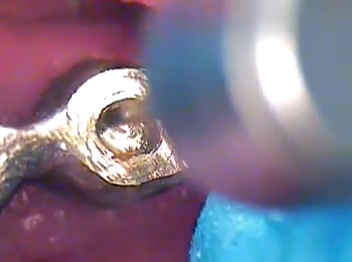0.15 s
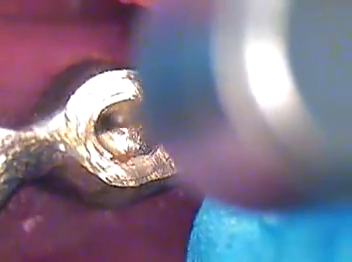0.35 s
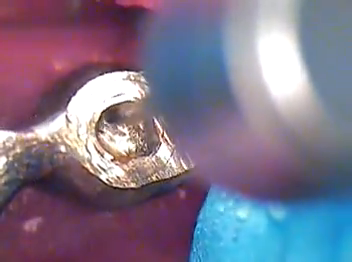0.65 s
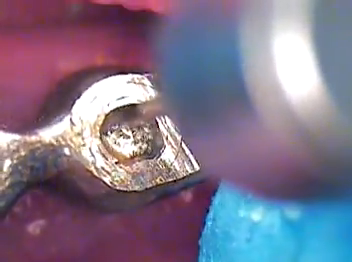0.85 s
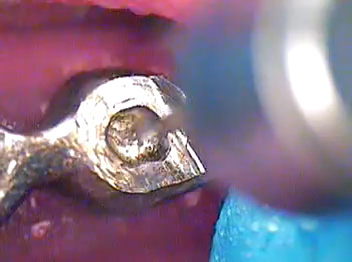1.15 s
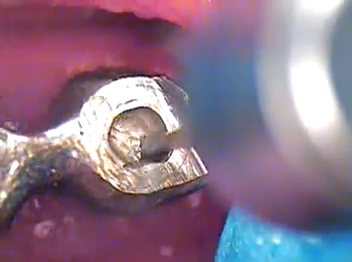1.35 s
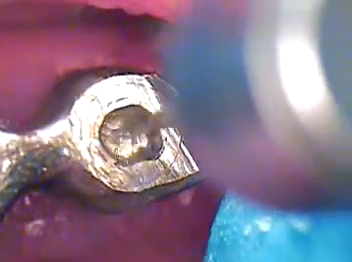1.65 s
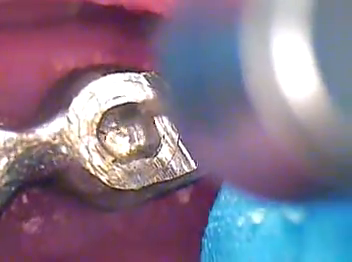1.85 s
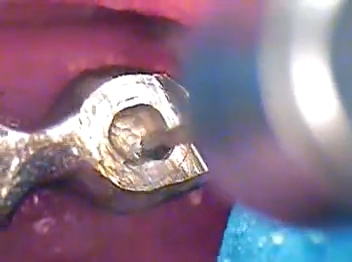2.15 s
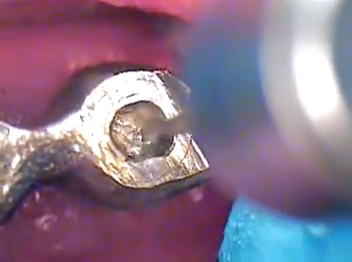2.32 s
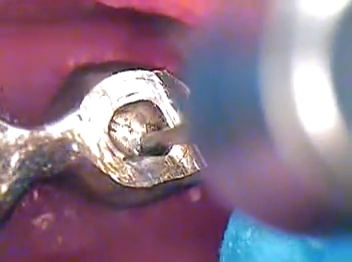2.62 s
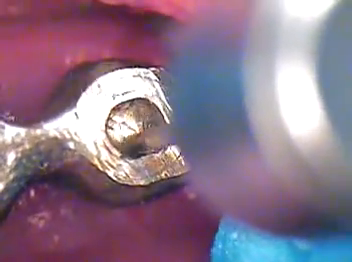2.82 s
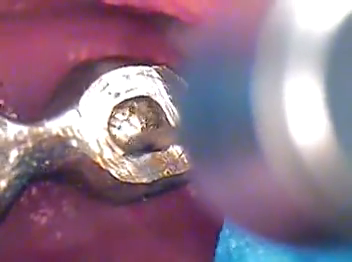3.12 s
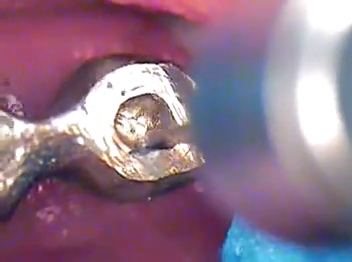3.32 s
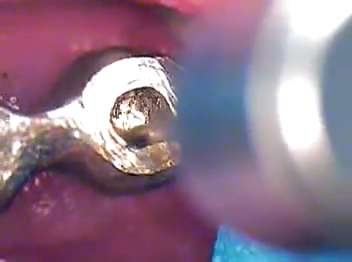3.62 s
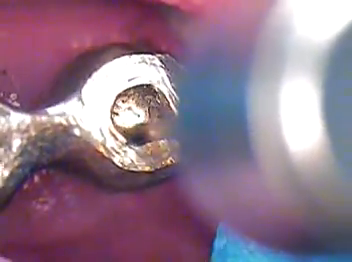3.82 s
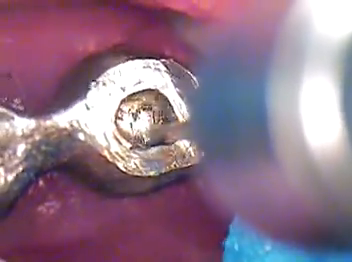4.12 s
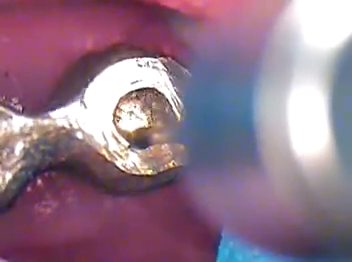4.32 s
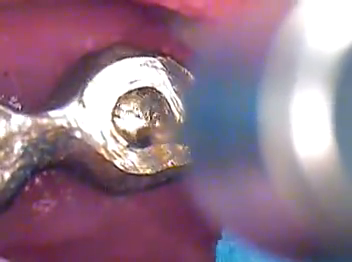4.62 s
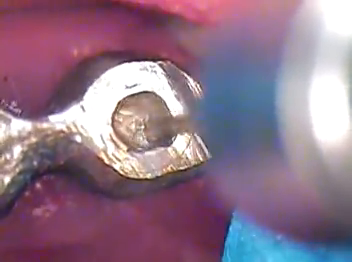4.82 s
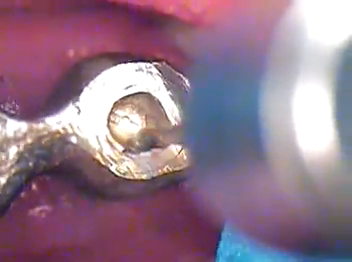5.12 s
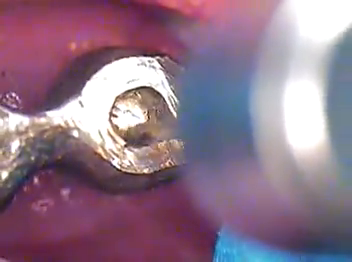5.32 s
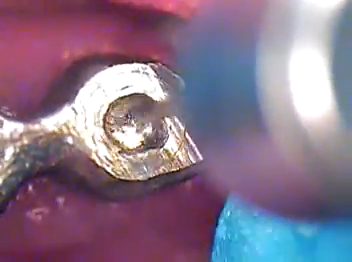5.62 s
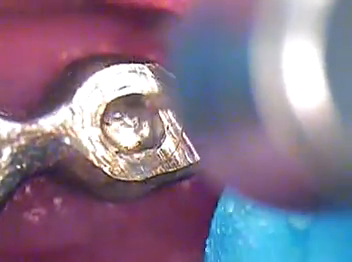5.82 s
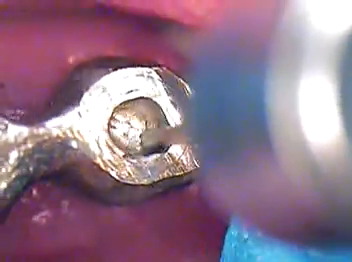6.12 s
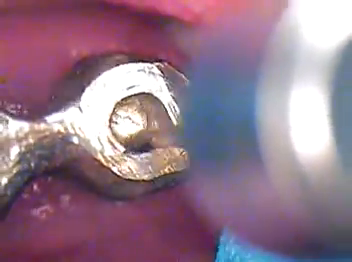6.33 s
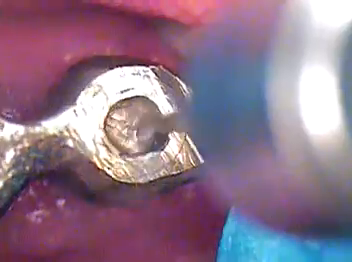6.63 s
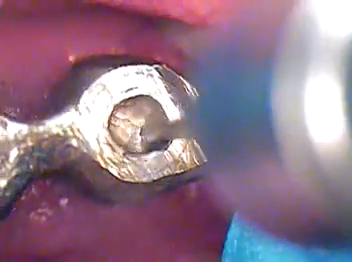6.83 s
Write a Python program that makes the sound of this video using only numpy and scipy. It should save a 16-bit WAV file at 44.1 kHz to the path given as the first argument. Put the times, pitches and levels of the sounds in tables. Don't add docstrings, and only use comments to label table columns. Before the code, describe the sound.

Close up in a small hard room, an air-driven dental drill cuts metal. Bright, dense spray hiss dominates throughout, pulsing gently with hand strokes. Inside it sits a thin, very high whine, first faint with a higher octave, then clearer from the middle, sagging and recovering before rising in pitch. Softer exhaust and suction rush lie beneath, with barely audible low knocks.

```python
import sys
import numpy as np
from scipy import signal
from scipy.fft import rfft, irfft
from scipy.io import wavfile
from scipy.ndimage import uniform_filter1d

SR = 44100
rng = np.random.default_rng(int(sys.argv[2]) if len(sys.argv) > 2 else 0)


def volts_from_decibels(level):
    exponent = np.asarray(level, float) / 20
    return 10 ** exponent


def int16_out(signal):
    q = np.round(np.clip(np.atleast_2d(signal).T, -1, 1) * 32767)
    wavfile.write(sys.argv[1], SR, q.astype(np.int16))


N = 306936
T = np.arange(N) / SR
HZ = np.arange(N // 2 + 1) * SR / N

# time_s, shaft_rate_hz
SHAFT_SPEED = [(0, 4608), (.6, 4241), (1.15, 4630), (1.76, 4479), (2.42, 4705), (2.63, 4900), (2.82, 4720),
               (3.86, 4736), (4.31, 5142), (4.7, 4807), (4.88, 5352), (5.19, 5632), (5.82, 5342),
               (6.02, 5525), (6.26, 5508), (6.96, 5365)]
# middle_s, length_s, sag_hz
BUR_BITES = [(.206, .33, 39), (.704, .07, 54), (2.917, .09, 89), (3.121, .2, 190), (3.237, .547, 377),
             (3.861, .848, 420), (3.919, .183, 128), (4.463, .128, 83), (5.343, .507, 106),
             (5.665, .183, 83), (6.44, .36, 85), (6.715, .359, 158)]
# time_s, shaft_tone_db, octave_db
GRIP_LEVELS = [(0, -58, -48), (.39, -57, -33), (2.38, -56, -44), (2.52, -43, -45), (2.65, -47, -35),
               (4.73, -45, -35.5), (4.8, -38, -61), (5.6, -42, -61), (6.96, -41, -57)]
# middle_s, length_s, shaft_change_db, octave_change_db
HEAD_TURNS = [(.43, .2, -4, -15), (.63, .2, 3, 3), (1.3, 1.3, 0, -12), (2.09, .6, 0, -5),
              (2.76, .19, 0, -10), (2.9, .4, -16, -4), (3.15, .22, -8, -11), (3.36, .42, -11, -1),
              (3.74, .26, -14, -12), (3.89, .1, 3, 4), (3.98, .14, -2, -9), (4.05, .12, -8, 0),
              (4.17, .11, 0, -8), (4.33, .3, -2, -2), (4.46, .18, -6, -8), (4.57, .1, -10, 0),
              (4.89, .12, -4, 0), (5.02, .12, -6, 0), (5.11, .14, 2, 0), (5.32, .1, -9, 5),
              (5.7, .25, -6, 9), (5.79, .1, -16, 14), (5.91, .12, 4, 0), (5.98, .07, -4, 0),
              (6.16, .3, 5, 0), (6.31, .11, -7, 6), (6.39, .32, -2, 14), (6.57, .18, 5, 0),
              (6.71, .3, 1, 12), (6.79, .13, -6, 0)]
# multiple_of_shaft_rate, start_s, end_s, level_db
BEARING_LINES = [
    (1.195, 0, .7, -59),
    (1.195, 1.1, 1.7, -60),
    (1.195, 2.3, 4.3, -60),
    (1.195, 5.05, 5.3, -55),
    (.798, .1, 2.3, -58),
    (1.398, .5, 1.1, -60),
    (1.797, .3, 2.1, -52),
    (1.797, 3.3, 4.1, -53),
    (.595, 5.4, 6.4, -56),
    (.333, 5.85, 6.15, -66),
]

BAND_EDGES = (140, 900, 2500, 6300, 8300, 10800, 15000)
# frequency_hz, density_db_per_hz
SPRAY_OUTLINE = [(6300, -71), (7004, -57), (7786, -62), (8656, -60), (9623, -59), (10699, -72),
                 (11894, -62), (13223, -63), (14000, -72), (14420, -72), (14600, -83), (14700, -92),
                 (14740, -135)]
# centre_hz, width_hz, gain_db
SPRAY_RESONANCES = [(6491, 215, -2), (6593, 84, 3), (7040, 123, -3), (7316, 59, 2), (7820, 388, 2),
                    (8184, 114, -3), (8305, 83, -4), (8690, 388, 6), (9194, 118, -3), (9338, 129, 1),
                    (9587, 129, -4), (10007, 273, 2), (10157, 129, -3), (10487, 114, -3), (10725, 194, 3),
                    (10914, 215, -2), (11047, 388, -3), (11412, 179, 2), (12775, 689, -2), (13632, 388, -4),
                    (13869, 235, 1)]
# time_s, splash_db
SPLASH_LEVELS = [(0, -24.5), (.32, -25), (1.08, -23), (1.47, -26.5), (1.88, -23), (2.24, -26), (3.22, -28),
                 (3.72, -30.5), (4.07, -27), (4.45, -31), (4.98, -26.5), (5.36, -30), (5.72, -22.5),
                 (5.95, -23), (6.15, -28), (6.45, -31.5), (6.72, -25), (6.96, -27)]
# level_at_usual_splash_db, gain_db_per_splash_db
SPLASH_FOLLOWING = [
    (-32, 0.62),
    (-30.5, 1.11),
    (-35.5, 0.48),
    (-37, 0.2),
]
# middle_s, length_s, body_gain_db, top_gain_db
HAND_STROKES = [(.12, .25, 0.5, 1), (.47, .3, -1, 2.5), (.65, .2, -1, 0), (1.05, .2, -0.5, 1.5),
                (1.28, .2, 0.5, 0), (1.75, 0.43, 1, 0.5), (2.13, .2, 1, 0), (2.44, 0.44, 2, 1.5),
                (2.8, .22, 0, 0), (3.07, .22, 0, 1.5), (3.34, .22, 0.5, 2), (3.5, .3, 1, 1),
                (3.87, 0.13, 0, 2), (4.08, 0.24, -1.5, 1), (4.35, 0.29, 0, 2.5), (4.62, .3, 0.5, 2),
                (4.87, .2, 0, 0.5), (5.26, .25, 0, 2), (5.62, .2, 0.5, 1.5), (5.86, .35, -0.5, 3),
                (6.35, .2, 1, 2.5)]
# frequency_hz, density_db_per_hz
EXHAUST_OUTLINE = [(2500, -71), (3150, -69), (3969, -70), (5000, -71), (6300, -71)]
# centre_hz, width_hz, gain_db
EXHAUST_RESONANCES = [(2513, 47, -7), (2640, 65, -3), (2738, 39, 2), (2910, 150, 5), (3110, 65, 4),
                      (3157, 63, -5), (3243, 108, -3), (3381, 194, 4), (3651, 97, -4), (3808, 28, -3),
                      (3913, 63, -5), (3957, 49, 3), (4163, 64, 4), (4234, 65, -6), (4270, 92, 5),
                      (4618, 52, 3), (4678, 27, -3), (4708, 65, -7), (4778, 90, 4), (4901, 123, 4),
                      (4947, 27, 0), (5129, 65, -3), (5300, 161, -2), (5475, 345, -2), (5699, 114, 4),
                      (5833, 35, 3), (6103, 44, -3), (6182, 67, -4)]
# frequency_hz, density_db_per_hz
HOSE_OUTLINE = [(150, -135), (222, -125), (256, -95), (431, -92), (612, -90), (870, -88), (1237, -71),
                (1759, -84), (2500, -78)]
# centre_hz, width_hz, gain_db
HOSE_RESONANCES = [(908, 13, -4), (981, 19, 4), (1053, 20, -7), (1088, 32, 4), (1121, 17, -5),
                   (1152, 32, 5), (1178, 32, -4), (1273, 17, 3), (1353, 23, -8), (1429, 54, 7),
                   (1464, 24, -11), (1561, 17, 7), (1582, 23, -9), (1635, 59, 4), (1710, 32, -5),
                   (1754, 27, 5), (1806, 52, -6), (1834, 32, 6), (1877, 27, -8), (1899, 172, 3),
                   (2034, 32, -4), (2092, 52, 4), (2187, 34, -6), (2240, 15, -4), (2353, 17, -3),
                   (2424, 97, 5), (1223, 14, 6), (838, 20, 5)]
# middle_s, length_s, gain_db
HOSE_GULPS = [(.06, 0.08, 1.5), (2.1, .1, 1), (4.21, .12, 5), (4.55, 0.15, 1.5), (4.87, .1, 3),
              (5.04, 0.27, 2.5), (5.44, .12, 2.5), (5.7, .15, 0.5), (6.16, 0.45, 2), (6.61, .12, 3.5),
              (6.96, 0.24, 6)]

# frequency_hz, density_db_per_hz
RUMBLE_OUTLINE = [(5.9, -30), (10, -12), (16, -9), (19, -16), (25, -11.5), (33, -23), (70, -24.5),
                  (140, -52.5), (180, -81), (310, -120)]
# time_s, level_db
TOP_SPURTS = [
    (.705, -56),
    (.862, -47),
    (5.9, -46),
]
# time_s, peak_db
STAND_BUMPS = [(2.118, -74), (2.594, -72), (2.715, -66), (3.18, -84), (3.519, -69), (3.607, -79),
               (3.717, -64), (4.033, -68), (4.173, -64), (4.21, -51), (4.268, -76), (4.335, -68.5),
               (4.545, -76), (4.595, -70), (4.645, -68), (4.714, -72), (4.873, -73), (5.222, -67),
               (5.449, -76), (6.284, -64.5), (6.357, -74), (6.44, -70), (6.52, -75), (6.6, -70),
               (6.756, -72)]
# time_s, peak_db, pitch_hz
STAND_THUDS = [
    (2.79, -71, 110),
    (3.185, -68, 150),
    (3.62, -66, 130),
    (4.215, -59, 100),
    (4.35, -65, 130),
    (4.1, -70, 170),
    (5.1, -74, 190),
]


def rows(table):
    s, *columns = np.transpose(table)
    return [np.interp(T, s, c) for c in columns]


def swells(table):
    s, length, *columns = np.transpose(table)
    coarse = T[::100]
    phase = np.pi * np.clip((coarse[:, None] - s) / length, -.5, .5)
    shape = np.cos(phase) ** 2
    return [np.interp(T, coarse, shape @ c) for c in columns]


def walk(rate):
    hold = int(SR / rate)
    steps = np.repeat(rng.standard_normal(N // hold + 1), hold)
    return 1.215 * uniform_filter1d(uniform_filter1d(steps, hold), hold)[:N]


def hiss(outline, path, lo_hz, hi_hz, flicker_db, rate, parts=4):
    hz, db = np.transpose(outline)
    colour = np.interp(np.log(HZ + 1), np.log(hz), db)
    for centre, width, gain in path:
        colour = colour + gain / (1 + (2 * (HZ - centre) / width) ** 2)
    edges = np.geomspace(lo_hz, hi_hz, parts + 1)
    below = [np.clip(.5 + (e - HZ) / (e / 20), 0, 1) for e in edges]
    spectrum = rfft(rng.standard_normal(N)) * volts_from_decibels(colour) / np.sqrt(below[-1] - below[0] + 1e-9)
    out = np.zeros(N)
    for under, over in zip(below, below[1:]):
        out = out + volts_from_decibels(flicker_db * walk(rate)) * irfft(spectrum * (over - under), N)
    return out / np.std(out)


def rotor():
    inertia_s, waver_hz, waver_db = .08, 4, 1.3
    hz = rows(SHAFT_SPEED)[0] - swells(BUR_BITES)[0]
    hz = uniform_filter1d(hz, size=int(inertia_s * SR)) + waver_hz * walk(60)
    angle = 2 * np.pi * np.cumsum(hz) / SR
    out = np.zeros(N)
    tones_db = np.add(rows(GRIP_LEVELS), swells(HEAD_TURNS))
    for order, db in enumerate(tones_db, start=1):
        out = out + volts_from_decibels(db + waver_db * walk(30)) * np.sin(order * angle)
    for order, start, end, db in BEARING_LINES:
        gate = np.clip(np.minimum(T - start, end - T) / 0.036, 0, 1)
        out = out + gate * volts_from_decibels(db + 3.3 * walk(12)) * np.sin(order * angle)
    return np.sqrt(2) * out


def followed_db():
    usual_db = -27
    excess_db = rows(SPLASH_LEVELS)[0] - usual_db
    return [db + share * excess_db for db, share in SPLASH_FOLLOWING]


def spray():
    low_db, middle_db, top_db, _ = followed_db()
    body_stroke, top_stroke = swells(HAND_STROKES)
    levels_db = [low_db + 0.37 * body_stroke, middle_db + body_stroke, top_db + top_stroke]
    gust = volts_from_decibels(0.98 + 0.34 * walk(14))
    out = np.zeros(N)
    for db, lo, hi in zip(levels_db, BAND_EDGES[3:], BAND_EDGES[4:]):
        out = out + volts_from_decibels(db) * hiss(SPRAY_OUTLINE, SPRAY_RESONANCES, lo, hi, 0.45, 12, parts=2)
    return gust * out


def exhaust():
    noise = hiss(EXHAUST_OUTLINE, EXHAUST_RESONANCES, BAND_EDGES[2], BAND_EDGES[3], 0.45, 10)
    return volts_from_decibels(followed_db()[3]) * noise


def suction_hose():
    noise = hiss(HOSE_OUTLINE, HOSE_RESONANCES, BAND_EDGES[1], BAND_EDGES[2], 0.41, 11, parts=3)
    return volts_from_decibels(-47.5 + swells(HOSE_GULPS)[0]) * noise


def ventilation():
    noise = hiss(HOSE_OUTLINE, HOSE_RESONANCES, BAND_EDGES[0], BAND_EDGES[1], 1.0, 6.6, parts=3)
    return volts_from_decibels(-64.5) * noise


def rumble():
    return volts_from_decibels(-64 + 3.5) * hiss(RUMBLE_OUTLINE, [], 9.4, BAND_EDGES[0], 1.7, 2.8)


def mains_hum():
    mains_hz, peak_db = 57.7, -73.5
    return volts_from_decibels(peak_db + 2.2 * walk(9)) * np.sin(2 * np.pi * mains_hz * T)


def top_spurts():
    outline = [(14600, -40), (14700, 0), (15150, -1), (15330, -16), (15380, -60)]  # Hz, dB per Hz
    thin = hiss(outline, [], 14000, 16000, 0, 9, parts=1)
    return thin * sum(volts_from_decibels(db) * np.exp(-((T - s) / 0.015) ** 2) for s, db in TOP_SPURTS)


def stand_bumps():
    bump_hz, bump_s = 202, 0.0115
    bumps = [(s + bump_s, db, bump_hz) for s, db in STAND_BUMPS]
    out = np.zeros(N)
    for s, db, hz in bumps + list(STAND_THUDS):
        length = bump_s * volts_from_decibels(-.4 * (db + 72.5))
        pitch = hz * (1 + 0.068 * rng.standard_normal())
        envelope = np.exp(-((T - s) / length) ** 2)
        out = out + volts_from_decibels(db) * np.cos(2 * np.pi * pitch * (T - s)) * envelope
    return out


def mismatch(x):
    side_share = .035
    hz, s, cells = signal.stft(np.roll(x, N // 2), SR, nperseg=2048)
    chosen = rng.random((len(hz) // 32 + 1, len(s))) < side_share
    patch = np.repeat(chosen, 32, axis=0)[:len(hz)]
    treble = hz[:, None] > 1800
    return signal.istft(cells * patch * treble, SR, nperseg=2048)[1][:N]


def scene():
    whine = rotor()
    noise_bed = spray() + exhaust() + suction_hose() + ventilation()
    stand = rumble() + mains_hum()
    noise_bed = noise_bed + top_spurts()
    stand = stand + stand_bumps()
    mid = whine + noise_bed + stand
    side = volts_from_decibels(-13) * mismatch(noise_bed)
    return np.array([mid + side, mid - side])


def low_pass(x):
    return signal.sosfilt(signal.butter(12, 15460, fs=SR, output="sos"), x)


def record(dry):
    mix = dry + .01075
    return low_pass(mix)


dry = scene()
out = record(dry)
int16_out(out)
```